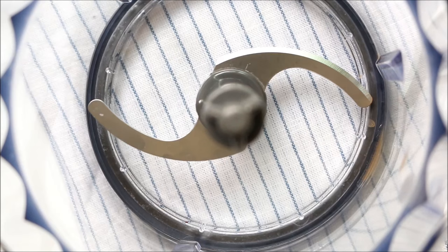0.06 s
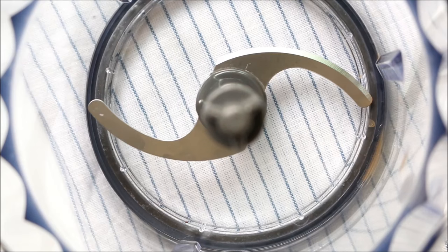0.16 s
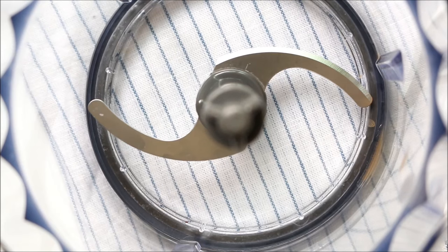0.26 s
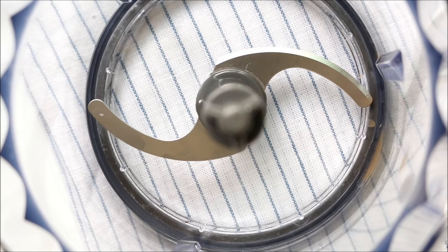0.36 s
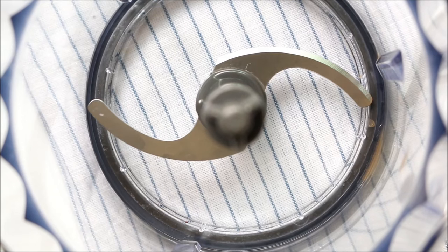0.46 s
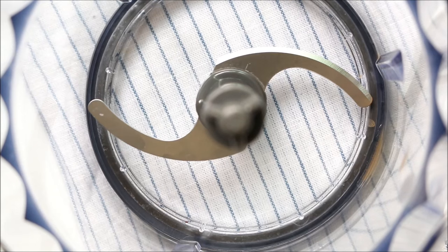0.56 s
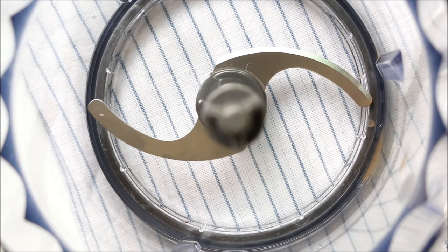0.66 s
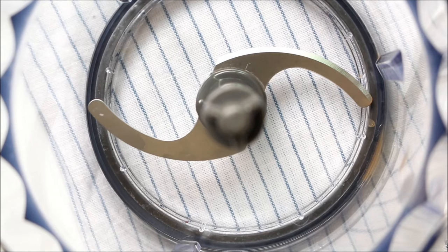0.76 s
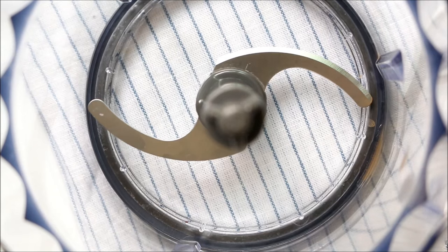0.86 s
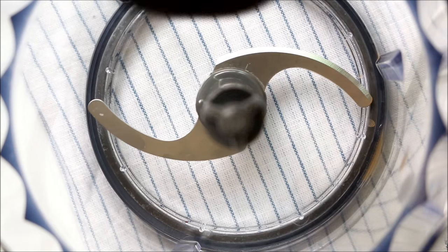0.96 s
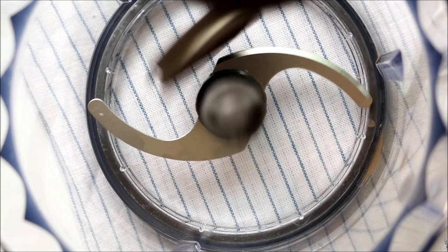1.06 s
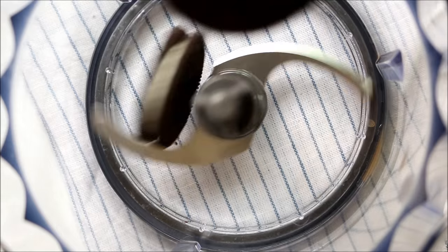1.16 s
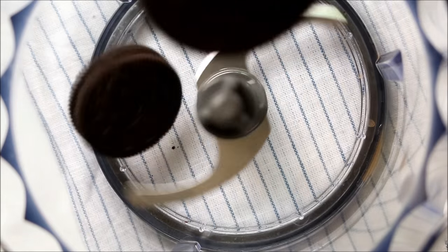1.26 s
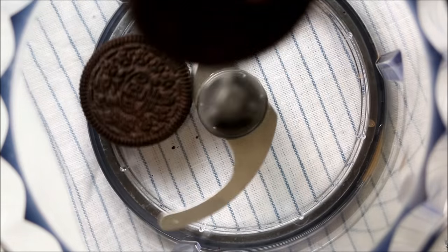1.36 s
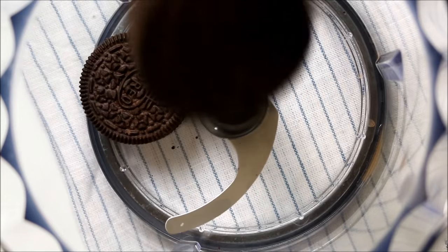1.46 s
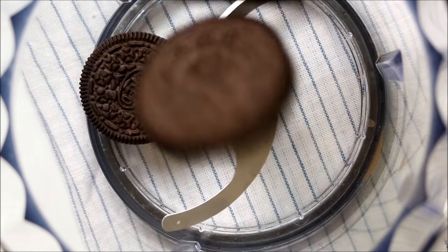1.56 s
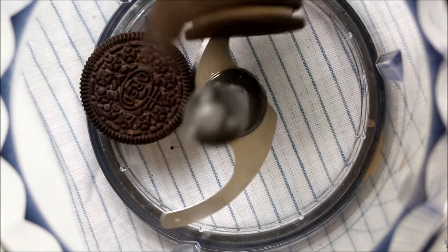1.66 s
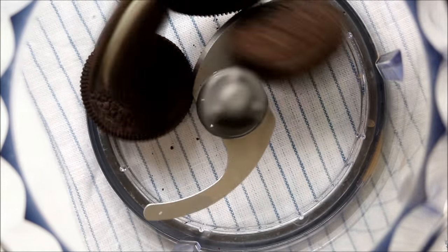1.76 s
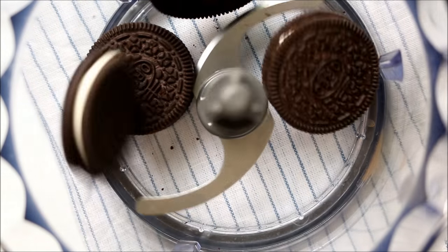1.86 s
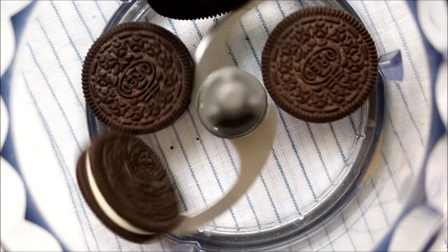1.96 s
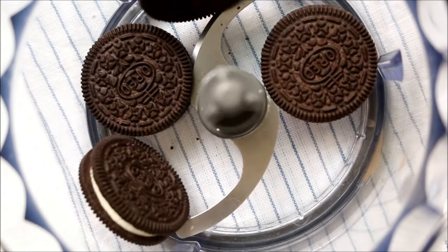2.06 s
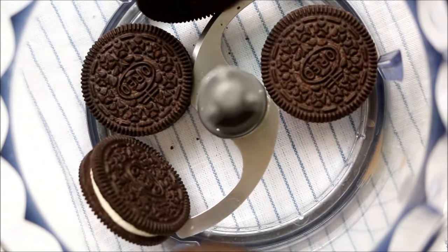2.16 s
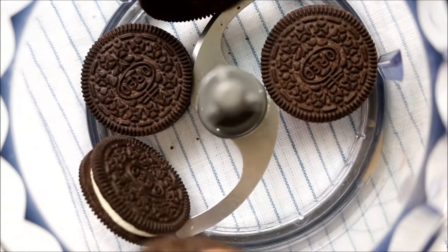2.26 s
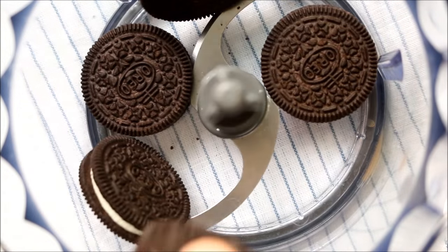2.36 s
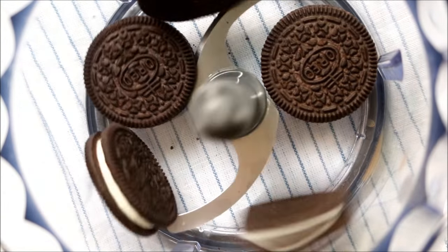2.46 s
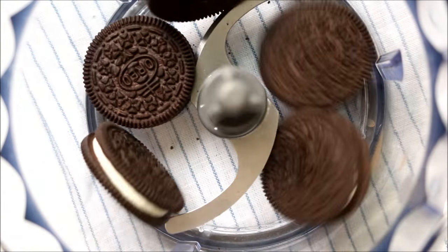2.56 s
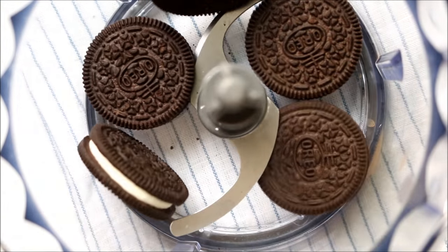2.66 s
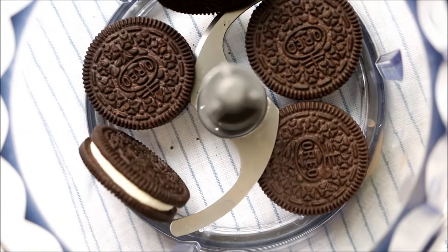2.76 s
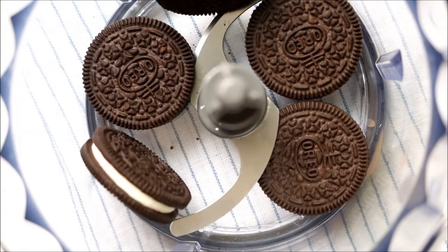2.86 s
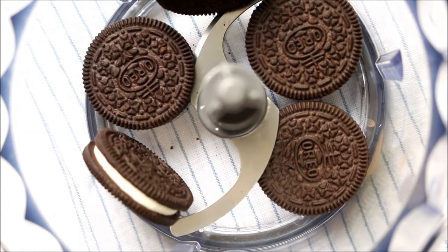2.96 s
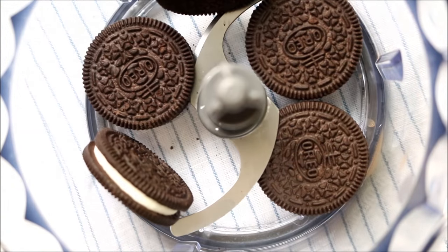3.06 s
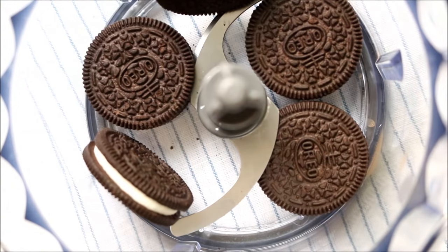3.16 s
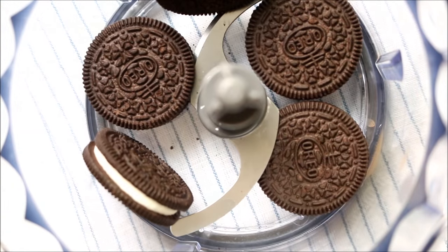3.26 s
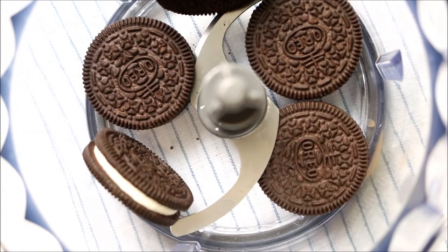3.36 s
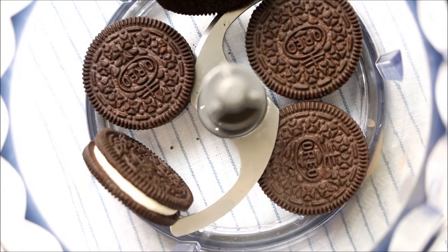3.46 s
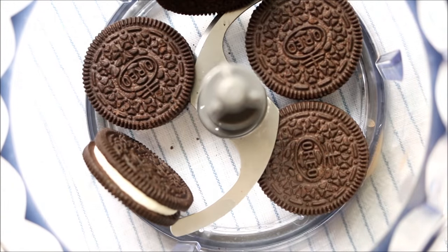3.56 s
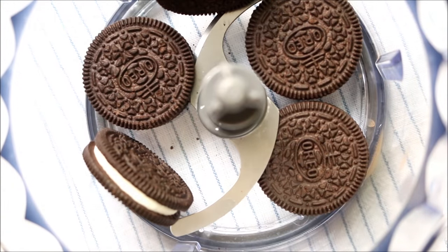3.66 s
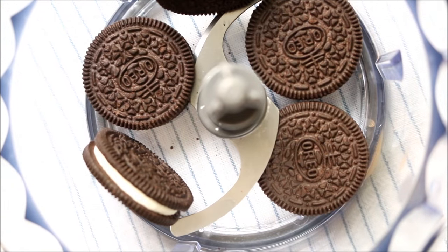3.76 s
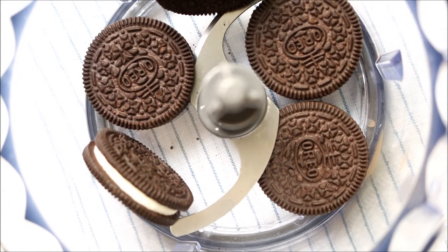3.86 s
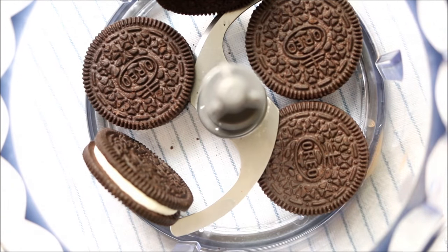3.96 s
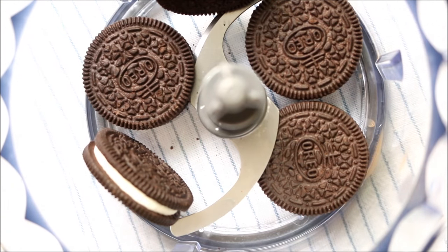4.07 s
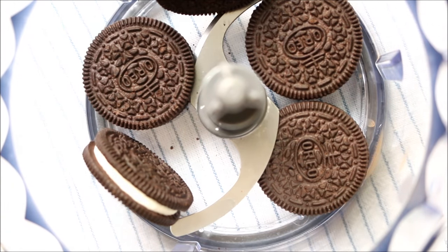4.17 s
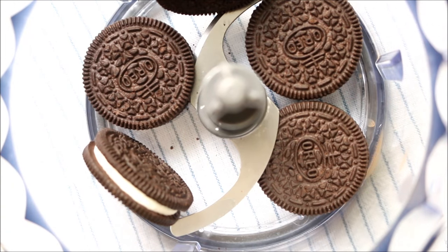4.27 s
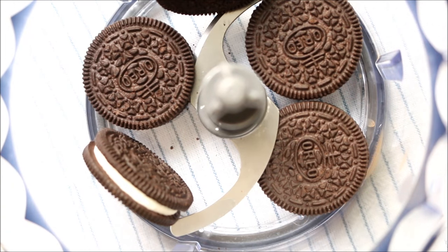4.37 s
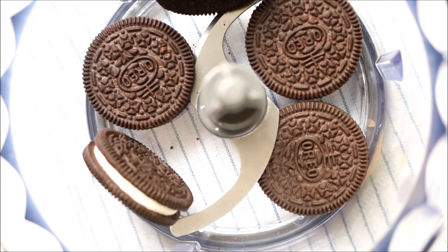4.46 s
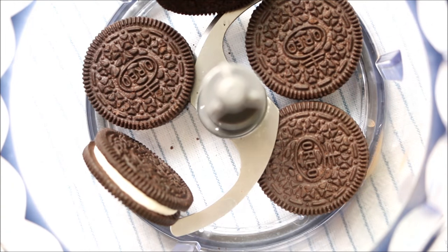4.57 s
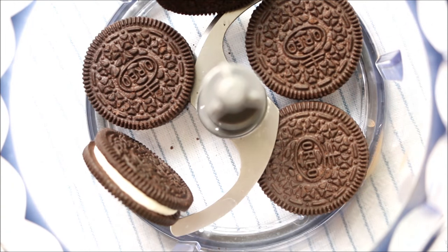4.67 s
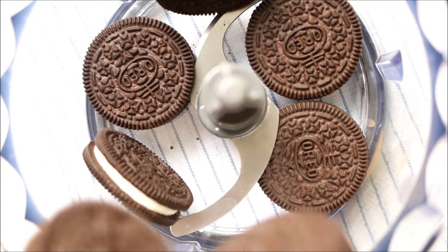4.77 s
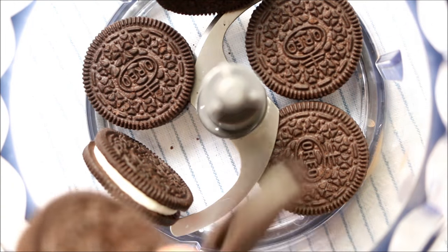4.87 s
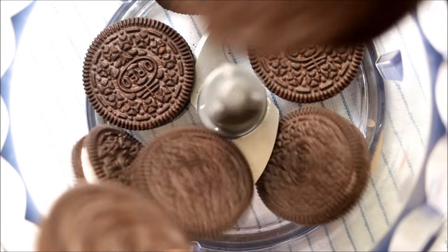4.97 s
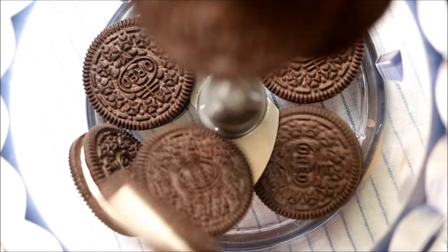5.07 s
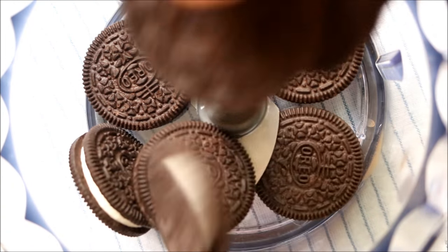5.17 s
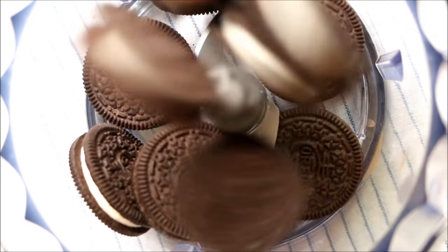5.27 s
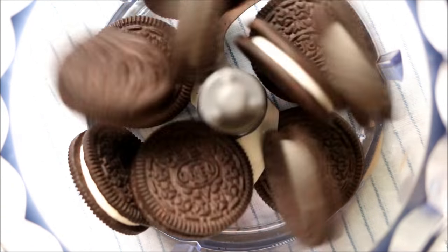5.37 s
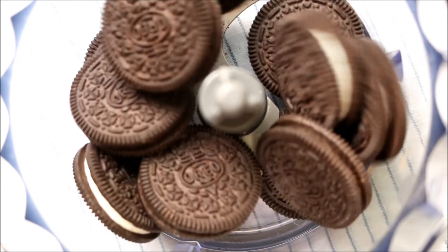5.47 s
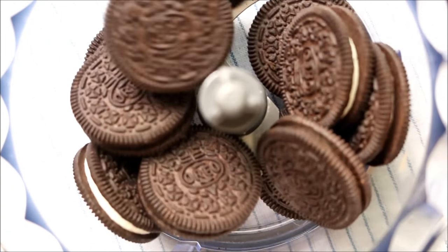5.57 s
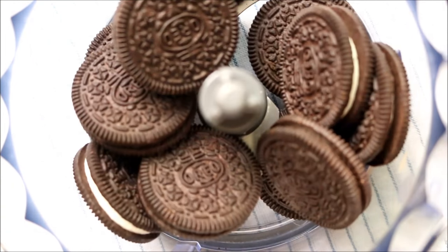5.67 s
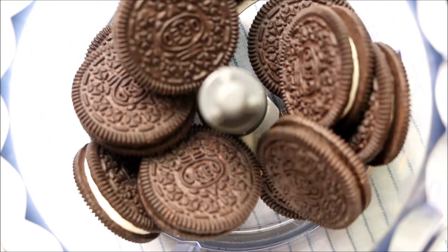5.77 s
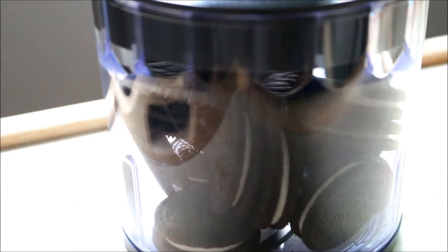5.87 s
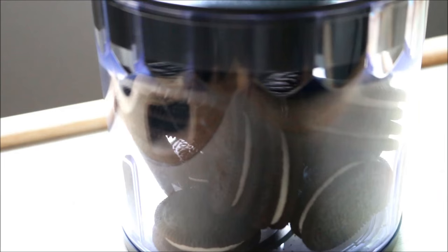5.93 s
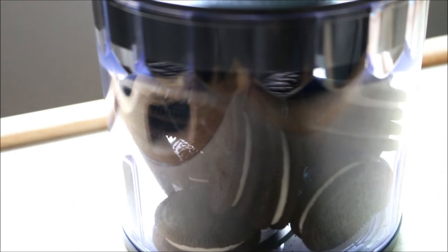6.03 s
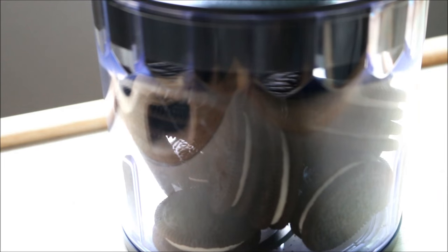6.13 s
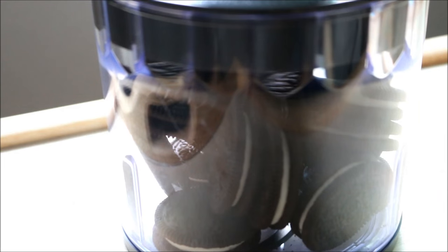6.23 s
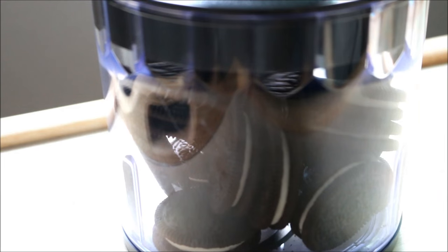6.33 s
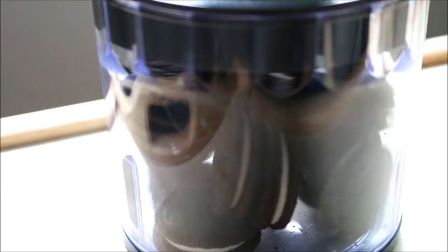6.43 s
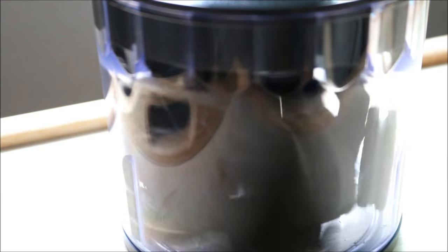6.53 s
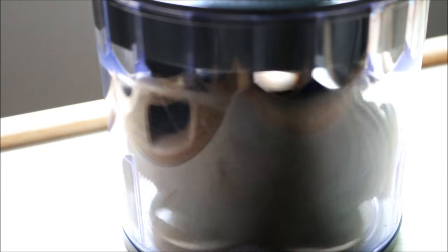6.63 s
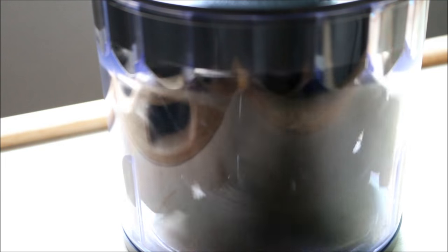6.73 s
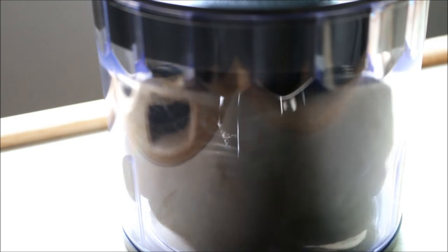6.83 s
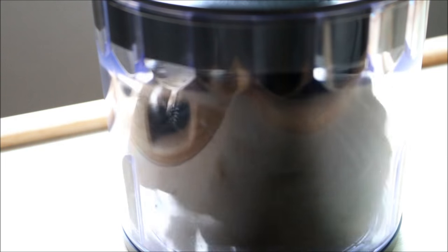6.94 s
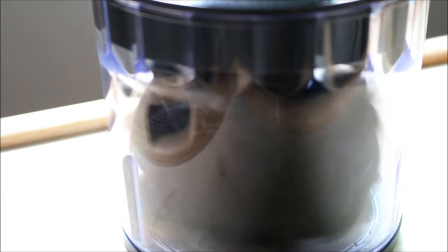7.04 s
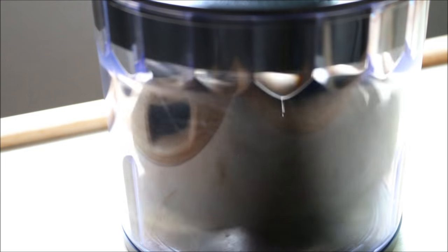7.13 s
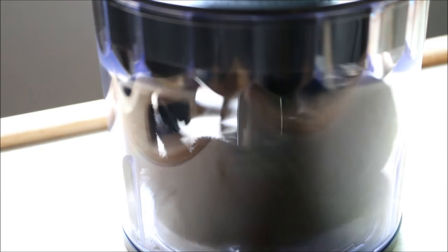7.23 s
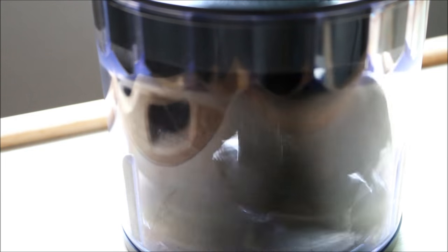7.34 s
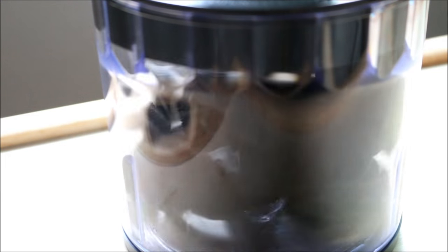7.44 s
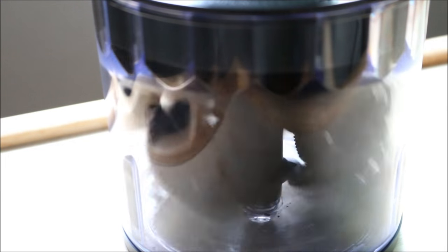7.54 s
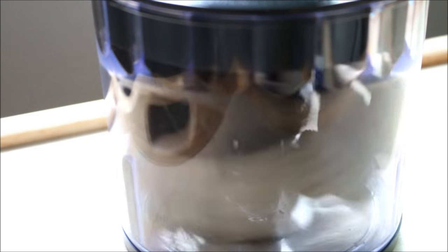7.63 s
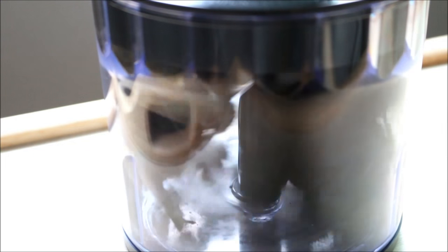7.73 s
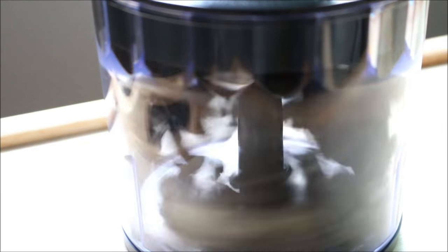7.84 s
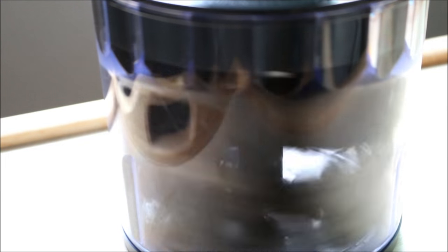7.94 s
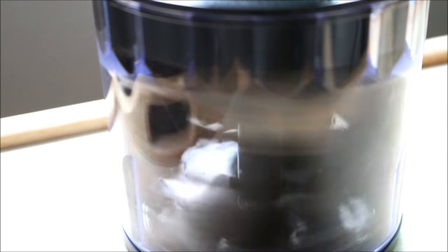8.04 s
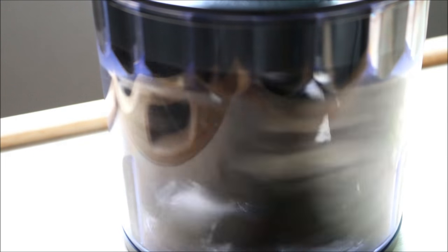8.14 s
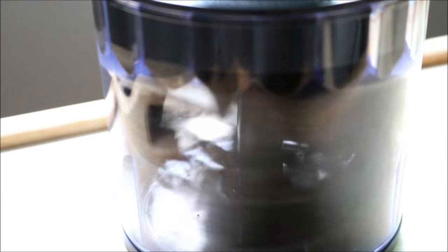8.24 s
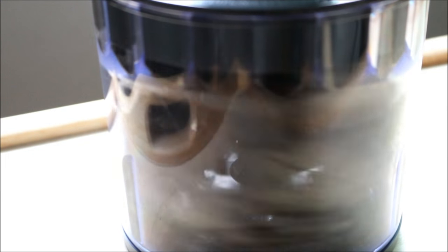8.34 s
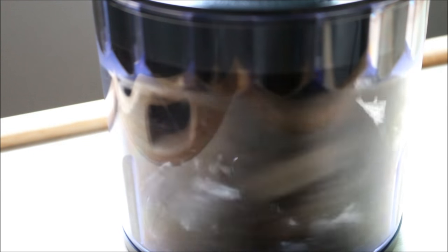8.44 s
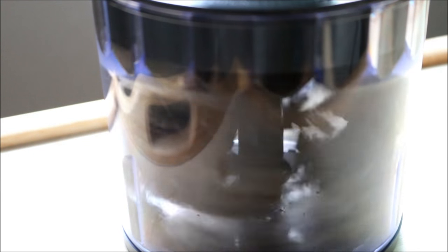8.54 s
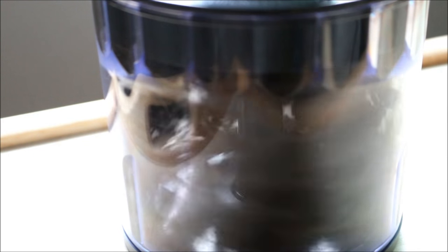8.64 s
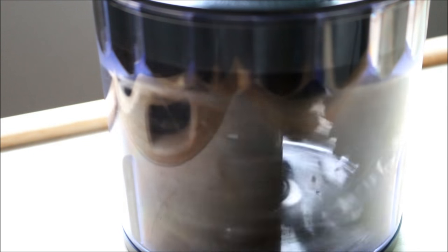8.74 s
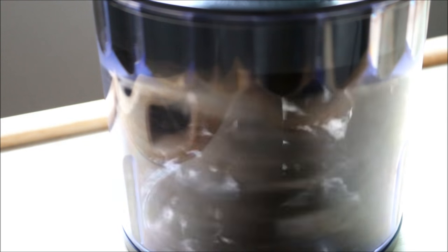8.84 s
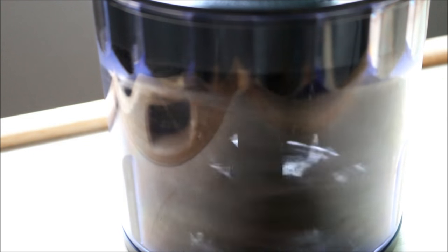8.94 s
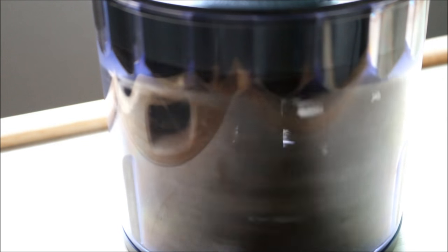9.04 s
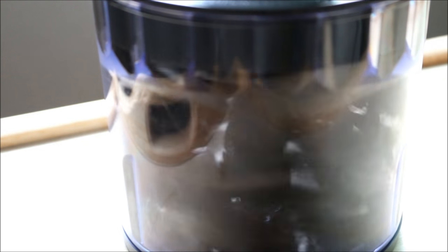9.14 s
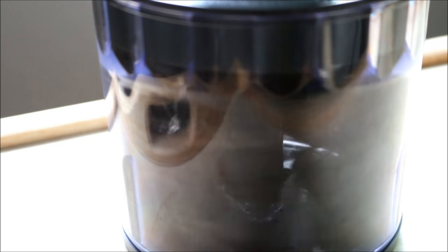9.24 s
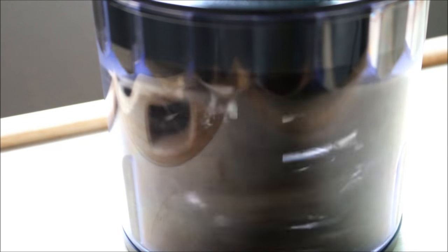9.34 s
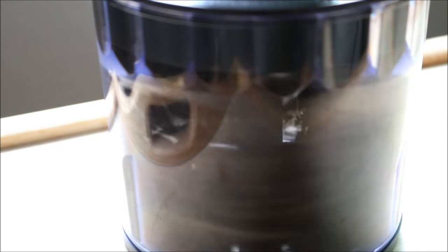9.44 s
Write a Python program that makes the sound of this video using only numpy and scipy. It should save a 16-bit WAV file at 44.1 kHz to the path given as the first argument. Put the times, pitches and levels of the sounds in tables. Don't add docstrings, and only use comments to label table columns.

```python
import sys
import numpy as np
from scipy import signal
from scipy.io import wavfile
from scipy.ndimage import uniform_filter1d

SR = 44100
rng = np.random.default_rng(int(sys.argv[2]) if len(sys.argv) > 2 else 0)


def voltage_ratio(level):
    return 10 ** (np.asarray(level, float) / 20)


def log_audio(samples):
    frames = np.atleast_2d(samples).T
    limited = np.clip(frames, -1, 1)
    pcm = np.round(limited * 32767).astype(np.int16)
    wavfile.write(sys.argv[1], SR, pcm)


N = 418950
TIME = np.arange(N) / SR
# start in seconds, end in seconds.
SCENE_CHANGE = (5.911, 5.975)


def evened(x):
    return x / np.sqrt(np.mean(x ** 2) + 1e-20)


def peaked(x):
    return x / np.max(np.abs(x))


def read(points, hz):
    f, value = np.transpose(points)
    return np.interp(np.log(hz + 1), np.log(f + 1), value)


def level(rows):
    rows, out = np.asarray(rows), np.zeros(N)
    at = np.arange(round(rows[0, 0] * SR), min(round(rows[-1, 0] * SR), N))
    out[at] = voltage_ratio(np.interp(at / SR, rows[:, 0], rows[:, 1]))
    return out


def add(mix, s, sound):
    part = mix[round(s * SR):][:len(sound)]
    part += sound[:len(part)]


def passed(x, lo_hz, hi_hz):
    return signal.sosfilt(signal.butter(2, [lo_hz, hi_hz], "band", fs=SR, output="sos"), x)


def coloured(x, points):
    hz = np.abs(np.fft.fftfreq(4096, 1 / SR))
    log_gain = np.log(voltage_ratio(np.maximum(read(points, hz), -90)))
    response = np.fft.ifft(np.exp(np.conj(signal.hilbert(log_gain)))).real[:2048]
    return evened(signal.oaconvolve(x, response)[:len(x)])


def resonator(x, hz, width):
    return signal.lfilter(*signal.iirpeak(hz, hz / width, SR), x)


def resonant(x, peaks):
    return evened(sum(voltage_ratio(db) * resonator(x, hz, width) for hz, width, db in peaks))


def ring(modes, t, spread):
    chance = np.clip(rng.standard_normal((len(modes), 2)), -2, 2)
    out = np.zeros(len(t))
    for (hz, db, t60), (louder, sharper) in zip(modes, chance):
        fading = voltage_ratio(db + 2.5 * louder - 60 * t / t60)
        out += fading * np.sin(2 * np.pi * hz * (1 + spread * sharper) * t)
    return out


def grains(per_s, spread_db, wash):
    size = voltage_ratio(spread_db * np.minimum(rng.exponential(1, N), 3))
    size *= rng.random(N) < per_s / SR
    return evened(size * rng.standard_normal(N)) + wash * rng.standard_normal(N)


def lumps(per_s, depth_db):
    drift = evened(uniform_filter1d(rng.standard_normal(N), int(SR / per_s)))
    return evened(voltage_ratio(depth_db * drift))


def slopes(rows):
    s, db, rise, fall = np.transpose(rows)[:, :, None]
    t = np.arange(0, N / SR + .01, .002)
    return t, db, np.maximum((s - t) / abs(rise), (t - s) / abs(fall))


def strokes(rows):
    t, db, away = slopes(rows)
    return np.interp(TIME, t, voltage_ratio(db - 20 * away).sum(axis=0))


# frequency in Hz, density in dB per Hz.
HISS_FIRST = [(40, -4.5), (90, -7.5), (250, -12), (600, -18), (1100, -19.5), (2800, -24), (15000, -27),
              (16500, -37)]
# frequency in Hz, density in dB per
# Hz.
HISS_SECOND = [(40, -6), (250, -12), (1200, -15), (2500, -22), (15000, -26.5), (16500, -38)]
# time in seconds, level in dB.
HISS_LEVEL = [(0, -56), (.25, -59.5), (5.9, -60), (5.97, -54), (6.01, -62), (6.2, -67), (9.5, -68)]


def hiss():
    noise = rng.standard_normal(N)
    first, second = coloured(noise, HISS_FIRST), coloured(noise, HISS_SECOND)
    return level(HISS_LEVEL) * np.where(TIME < SCENE_CHANGE[1], first, second)


# peak in seconds, level in dB.
NUDGES = [(0, -61), (1.3, -45), (1.81, -43.5), (2.52, -42), (3.36, -52), (4.02, -53), (5.04, -46),
          (5.549, -42.5), (7.45, -61), (8.21, -61), (8.97, -52)]


def table():
    wander = evened(uniform_filter1d(rng.standard_normal(N), 6000))
    sway = np.sqrt(2) * np.sin(2 * np.pi * np.cumsum(53.3 + 0.85 * wander) / SR)
    rise_s, fall_s, tremor_db = 0.085, 0.66, -74
    change = SCENE_CHANGE[0]
    before = [(s, db, rise_s, fall_s) for s, db in NUDGES if s < change]
    after = [(s, db, rise_s, fall_s) for s, db in NUDGES if s > change]
    nudges = strokes(before) * (TIME < change) + strokes(after)
    return (nudges + voltage_ratio(tremor_db)) * sway * lumps(9, 2.5)


# peak in seconds, level in dB, rise in seconds, fall in seconds.
BRUSHES = [
    (.964, -45.5, 0.096, 0.041),
    (3.194, -58.5, 0.33, 0.18),
    (3.334, -46, 0.026, 0.13),
    (3.568, -53, 0.038, 0.18),
    (3.854, -52.5, 0.13, 0.043),
    (4.092, -52, 0.18, 0.066),
    (4.2, -52, 0.014, 0.055),
    (4.646, -53, .02, 0.071),
    (4.752, -44.5, 0.009, 0.087),
]
# frequency in Hz, density in dB per Hz.
BRUSH_SPECTRUM = [(290, -37.5), (500, -11.5), (807, -13), (1450, -15.5), (6800, -9), (7530, -14.5),
                  (13100, -13), (16000, -19.5)]


def brushing():
    return strokes(BRUSHES) * coloured(grains(3500, 2.6, 0.34), BRUSH_SPECTRUM)


# frequency in Hz, width in Hz, level in dB.
WALL_MODES = [(1410, 2900, 2.5), (1930, 250, -9), (2280, 130, 7), (2480, 91, 0)]
# frequency in Hz, width in Hz, level in dB.
BLADE_MODES = [(3870, 550, 1.5), (4650, 360, 4), (5400, 180, -4), (5940, 330, -3.5), (10000, 12000, -10)]
BODY_DB = -3.5


def drop(thud_db, hz, wall_db, tick_db):
    t = np.arange(2600) / SR
    crumble = rng.standard_normal((2, len(t))) * t / 0.0057 * np.exp(-t / [[.0012], [.0008]])
    crumble += 0.062 * rng.standard_normal((2, len(t))) * np.exp(-t / [[.006], [.0035]])

    off_air = abs(np.log(hz / 640))
    thud = ring([(hz, 0, .017), (635, -17 - 20 * off_air, .06), (185, -27, .16), (225, -27, .12),
                 (1.3 * hz, -6, .009)], t, 0.032)
    softness = thud_db - tick_db
    thud = peaked(thud * (1 - np.exp(-t / (0.0005 * voltage_ratio(0.5 * softness)))))

    wall_spot = rng.uniform(-3, 3, len(WALL_MODES))
    blade_spot = rng.uniform(-3, 3, len(BLADE_MODES))
    wall_spot[0] = np.clip(0.43 * softness - 2, -8, 8)
    blade_spot[-1] = 0.069 * (tick_db + 18)
    wall = resonant(crumble[0], [(f, w, db + d) for (f, w, db), d in zip(WALL_MODES, wall_spot)])
    tick = resonant(crumble[1], [(f, w, db + d) for (f, w, db), d in zip(BLADE_MODES, blade_spot)])
    wall = passed(passed(wall, 740, 2300), 600, 3200)
    tick = passed(tick, 3000, 17000)
    return voltage_ratio(thud_db) * thud + voltage_ratio(wall_db + BODY_DB) * peaked(wall) + voltage_ratio(tick_db + BODY_DB) * peaked(tick)


def taps(s, gap, shrink, db, loss_db, hz, wall_db, tick_db, steps):
    times = s + gap * (1 - shrink ** steps) / (1 - shrink)
    return [(at, d, hz, d + wall_db, d + tick_db) for at, d in zip(times, db - loss_db * abs(steps))]


# start in seconds, thud in dB, thud pitch in Hz, wall in dB, tick in dB.
FIRST_DROPS = [(1.0973, -4.5, 671, 1, -3), (1.1073, -29, 599, -24, -7), (1.1794, -16.5, 717, -10.5, -22),
               (1.3094, -24.5, 674, -21, -6.5), (1.3639, -14, 954, -29, -20.5),
               (1.3746, -14.5, 610, -14, -15), (1.3943, -15.5, 884, -14, -22),
               (1.4004, -10.5, 573, -8.5, -9), (1.4472, -10, 660, -12, -16),
               (1.5384, -8.5, 630, -11.5, -20), (1.5776, -15, 610, -14.5, -35), (1.6418, -5.5, 573, -5, -2),
               (1.7232, -24, 633, -16, -22), (1.7443, -31.5, 624, -16, -14.5),
               (1.7589, -30.5, 624, -6, -31.5), (1.7918, -16, 1070, -19, -34),
               (1.8148, -11.5, 556, -9, -14), (1.8595, -15.5, 890, -18.5, -13.5),
               (1.8753, -15, 649, -19.5, -21), (1.8988, -21, 706, -16, -11), (1.9412, -44, 1010, -30, -16),
               (1.963, -17, 643, -26, -22), (1.9768, -22, 1470, -20, -20), (2.002, -10.5, 770, -7, -15.5)]
# start in seconds, thud in dB, thud pitch in Hz, wall in dB, tick in dB.
NEXT_DROP = [(2.455, -6, 693, -5, -12), (2.472, -11, 1310, -3.5, -12.5), (2.5262, -19, 526, -10.5, -20.5),
             (2.532, -8, 686, -6, -6.5), (2.5608, -19, 940, -31, -37.5), (2.5873, -9.5, 836, -12, -21.5),
             (2.626, -16, 1000, -13, -26), (2.661, -23, 676, -7, -18), (2.6683, -6.5, 796, -10.5, -13),
             (2.7094, -17, 900, -23.5, -20), (2.7126, -21.5, 650, -11.5, -28)]
# start in seconds, thud in dB, thud pitch in Hz, wall in dB, tick in dB.
HANDFUL_DROPS = [(4.9268, -3, 660, -9, -9), (4.9443, -20, 624, -24, -39), (4.9618, -19, 1120, -24, -30.5),
                 (4.994, -17, 600, -18, -28), (5.005, -14.5, 633, -16, -33.5),
                 (5.0357, -17, 1180, -22, -21), (5.0428, -18, 670, -8.5, -21.5),
                 (5.049, -18.5, 1140, -9, -25), (5.0762, -10.5, 815, -11.5, -24),
                 (5.1238, -17, 530, -11.5, -24.5), (5.232, -18.5, 1160, -20.5, -16.5),
                 (5.2673, -6, 653, -7, -15.5), (5.28, -20, 1500, -22.5, -14.5),
                 (5.308, -15, 1100, -25.5, -30.5), (5.3254, -12.5, 644, -10.5, -16.5),
                 (5.3328, -32, 602, -17, -9.5), (5.346, -1.5, 670, -7.5, -14.5),
                 (5.372, -46.5, 663, -27.5, -24), (5.4211, -11.5, 750, -9, -14),
                 (5.4415, -18.5, 1060, -23, -25.5), (5.472, -20.5, 1160, -16, -41)]
# start in seconds, thud in dB, tick in dB.
LIGHT_TOUCHES = [(1.5142, -26.5, -25.5), (1.5893, -20, -29.5), (1.702, -37, -19.5), (1.809, -32, -41.5),
                 (1.8328, -19.5, -40), (2.266, -35, -30), (2.599, -20, -27), (4.9794, -23, -29),
                 (5.1165, -20.5, -22), (5.519, -29, -31), (5.5428, -26.5, -28.5)]
BLADE_SING_HZ = [1733, 2030, 2766, 3250, 3760, 4425, 4730, 5250]


def impacts():
    out = np.zeros(N)
    touches = [(s, db, 750 * np.exp(0.23 * rng.uniform(-1, 1)), db + 2, tick) for s, db, tick in LIGHT_TOUCHES]
    wobble = taps(2.0435, gap=.0255, shrink=.875, db=-17, loss_db=2.5, hz=624, wall_db=3, tick_db=-0.5,
                  steps=np.arange(8))
    rock = taps(2.2497, gap=.0575, shrink=.96, db=-32, loss_db=6, hz=660, wall_db=5.5, tick_db=3.5,
                steps=np.arange(-1, 4))
    t = np.arange(9000) / SR
    for s, *blow in [*FIRST_DROPS, *NEXT_DROP, *HANDFUL_DROPS, *touches, *wobble, *rock]:
        add(out, s, drop(*blow))
        struck = rng.uniform(-16, 4, len(BLADE_SING_HZ))
        singing = [(hz, blow[-1] - 38 + d, 0.2) for hz, d in zip(BLADE_SING_HZ, struck)]
        add(out, s, ring(singing, t, .008))
    for s, db, *_ in rock:
        add(out, s, ring([(2470, db - 0.5, 0.066)], t[:4000], 0))
    return out


# start in seconds, peak in dB, centre in Hz.
EDGE_SNAPS = [(1.0974, -1.5, 9070), (1.3101, -21, 9100), (1.455, -23.5, 9330), (1.5224, -28.5, 8160),
              (1.5384, -18, 9560), (1.6453, -2, 12600), (1.731, -19, 11500), (1.7344, -24, 13000),
              (1.8813, -16.5, 8140), (1.9003, -15.5, 11000), (1.941, -20.5, 9560), (2.0996, -37.5, 10500),
              (2.131, -31.5, 13200), (2.169, -38, 8540), (2.455, -15.5, 9160), (2.4854, -30.5, 9220),
              (2.5256, -17, 8030), (2.5444, -24, 9900), (2.5731, -33.5, 9630), (2.5855, -18, 10280),
              (2.6004, -32, 9250), (2.672, -26, 8130), (4.9273, -9, 8850), (5.0795, -17, 9760),
              (5.115, -25, 11000), (5.228, -25, 10900), (5.2666, -18, 9250), (5.273, -22.5, 13320),
              (5.3337, -13.5, 11490), (5.3857, -31, 8120), (5.4264, -35, 10800)]


def snaps():
    t, out = np.arange(500) / SR, np.zeros(N)
    for s, db, hz in EDGE_SNAPS:
        crack = rng.standard_normal(len(t)) * t * np.exp(-t / 0.00059)
        crack = passed(resonant(crack, [(hz, hz / 2, 0)]), 4300, 14000)
        add(out, s, voltage_ratio(db - 1.5) * peaked(crack))
    return out


# start in seconds, peak in dB, pitch in Hz.
WALL_PATCHES = [(1.0978, -12, 2380), (1.1831, -15, 2330), (1.3103, -23, 3240), (1.364, -22, 1210),
                (1.376, -17, 1700), (1.4006, -0.5, 2280), (1.449, -10.5, 1300), (1.5398, -6.5, 1200),
                (1.5773, -13.5, 1080), (1.643, 1.5, 2150), (1.68, -26, 2260), (1.7205, -19, 1400),
                (1.7224, -21, 2200), (1.7624, -26.5, 2350), (1.7917, -17.5, 1270), (1.8152, -12.5, 2020),
                (1.8616, -5.5, 2320), (1.943, -15.5, 2450), (1.9604, -16.5, 1500), (1.9778, -29, 1410),
                (2.0036, -15.5, 1600), (2.0424, -9, 2480), (2.4543, -13, 1140), (2.4712, -8, 2080),
                (2.5321, -1, 2660), (2.5615, -13.5, 2260), (2.5874, -20, 1930), (2.6353, -27, 1260),
                (2.6677, -11, 2630), (2.7096, -7.5, 2290)]
# start in seconds, peak in dB, pitch in Hz.
BLADE_PATCHES = [(1.0978, -0.5, 3830), (1.1785, -24, 3980), (1.3096, -15, 5730), (1.3637, -21.5, 4100),
                 (1.3752, -22.5, 4300), (1.4006, -9, 3860), (1.5139, -17.5, 4800), (1.532, -14.5, 4420),
                 (1.6423, -1.5, 4800), (1.7284, -12.5, 4660), (1.815, -16.5, 6300), (1.8607, -22, 4200),
                 (1.8805, -23.5, 5100), (1.9, -16, 4700), (1.943, -22, 5860), (2.0018, -26, 4950),
                 (2.0365, -21, 3940), (2.2492, -28, 3820), (2.3065, -28, 3870), (2.3653, -26.5, 3750),
                 (2.4542, -22.5, 3560), (2.4715, -22, 4070), (2.526, -18.5, 3500), (2.574, -24.5, 4600),
                 (2.6672, -12, 3500), (2.7092, -23, 3770)]
# start in seconds, peak in dB, pitch in Hz.
HANDFUL_WALL_PATCHES = [(4.926, -1.5, 2370), (4.9582, -14.5, 1310), (4.9817, -20.5, 2150),
                        (4.9955, -9.5, 1440), (5.042, -18, 1560), (5.0795, 4, 2290), (5.1267, -12.5, 1490),
                        (5.2326, -23, 1520), (5.267, 0, 1410), (5.305, -19, 1350), (5.3243, -13, 1570),
                        (5.3459, -11.5, 2480), (5.3727, -17.5, 2230), (5.4217, -19, 1260),
                        (5.4721, -13.5, 2240)]
# start in seconds, peak in dB, pitch in Hz.
HANDFUL_BLADE_PATCHES = [(4.9273, -10, 4160), (5.0373, -18.5, 3770), (5.079, -16, 3800),
                         (5.1165, -21.5, 3740), (5.2331, -13, 5430), (5.267, -21, 4530), (5.305, -23, 3780),
                         (5.3316, -7, 5280), (5.347, -12, 4690), (5.3723, -21.5, 4960), (5.4202, -23, 5160)]


def patches(rows):
    t, out = np.arange(1200) / SR, np.zeros(N)
    for s, db, hz in rows:
        crumble = rng.standard_normal(len(t)) * t * np.exp(-t / .0011)
        patch = resonant(resonant(crumble, [(hz, hz / 6.4, 0)]), [(hz, hz / 2, 0)])
        add(out, s, voltage_ratio(db - 3.5) * peaked(patch))
    return out


def struck_patches():
    return patches([*WALL_PATCHES, *BLADE_PATCHES, *HANDFUL_WALL_PATCHES, *HANDFUL_BLADE_PATCHES])


# peak in seconds, level in dB, rise in seconds, fall in seconds.
AIR_SWELLS = [
    (1.122, -32, 0.0086, 0.024),
    (1.184, -10.5, 0.0091, 0.012),
    (1.73, -17.5, 0.013, 0.021),
    (1.76, -16.5, 0.02, 0.017),
    (1.868, -17, 0.0079, 0.013),
    (4.952, -17, 0.0095, 0.021),
    (5.008, -14.5, 0.014, 0.013),
    (5.331, -11, 0.007, 0.014),
    (5.39, -38, .02, 0.029),
]


def bowl_air():
    wander = evened(uniform_filter1d(rng.standard_normal(N), 800))
    return strokes(AIR_SWELLS) * np.sin(2 * np.pi * np.cumsum(617 + 20 * wander) / SR)


# peak in seconds, level in dB, rise in seconds, fall in seconds.
ROLLS = [
    (1.13, -37, 0.011, 0.84),
    (1.43, -42.5, 0.22, 0.065),
    (1.74, -28.5, .03, 0.18),
    (1.95, -33, 0.19, 0.29),
    (2.62, -33.5, 0.15, 0.18),
    (5.38, -32.5, 0.35, 0.27),
]
# frequency in Hz, width in Hz, level in dB.
BOWL_MODES = [(182, 210, -9), (633, 200, -2.5), (1000, 560, -7.5), (2290, 280, -2), (1720, 200, -10),
              (4600, 2500, -11), (10500, 7000, -22)]


def rolling():
    out = np.zeros(N)
    for hz, width, db in BOWL_MODES:
        contacts = evened(passed(grains(700, 1.8, .7), hz / 1.7, hz * 1.4))
        out += voltage_ratio(db) * resonator(contacts, hz, width)
    return voltage_ratio(-2.5) * strokes(ROLLS) * evened(out)


def cookies():
    return passed(impacts() + struck_patches() + bowl_air() + rolling(), 91, 13000) + snaps()


# start in seconds, peak in dB, pitch in Hz.
PLATE_KNOCKS = [
    (3.076, -33.5, 733),
    (3.171, -32, 1070),
    (3.33, -21, 1116),
    (3.549, -23.5, 530),
    (3.616, -30.5, 483),
    (3.757, -38, 488),
    (3.824, -28.5, 557),
    (4.038, -27.5, 604),
    (4.14, -31, 513),
]
# start in
# seconds, pitch in Hz, level in dB, t60 in seconds.
PLATE_RINGS = [(2.962, 1460, -35.5, 0.016), (2.962, 2540, -44, 0.033), (3.35, 1054, -49, 1.1),
               (3.562, 2800, -40, 0.064), (3.605, 1910, -51.5, 0.66), (3.619, 1040, -45, 0.98),
               (3.84, 2770, -44, 0.076), (4.1, 2770, -43, 0.056), (5.6, 685, -62, 1.8),
               (4.7, 89.3, -50, 0.63), (5.5, 199, -34, 0.37), (5.65, 212.7, -40.5, 0.094)]
# peak in seconds, level in dB, rise in seconds, fall in seconds.
HAND_GRABS = [
    (2.966, -45, 0.0085, 0.0085),
    (3.18, -40.5, 0.17, 0.45),
    (3.328, -30, 0.013, 0.12),
    (3.558, -30.5, 0.017, 0.12),
    (3.76, -37.5, 0.066, 0.063),
    (3.842, -35, 0.036, 0.054),
    (3.934, -37, 0.014, 0.084),
    (4.044, -37.5, 0.012, 0.11),
    (4.13, -44, 0.16, 0.19),
]
# frequency in Hz, width in Hz, level in dB.
PLATE_MODES = [(235, 49, 20.5), (467, 207, 18), (1070, 22, 8), (2350, 210, -1)]


def plate():
    t, out = np.arange(15000) / SR, np.zeros(N)
    soft, unsteady = 1 - np.exp(-t / 0.0011), lumps(12, 1.5)
    for s, peak_db, hz in PLATE_KNOCKS:
        knock = ring([(hz, 0, .02), (210, -6, .04), (500, -4, .03), (1150, -5, .02)], t, 0.014)
        add(out, s, voltage_ratio(peak_db) * peaked(knock * soft))
    for s, *mode in PLATE_RINGS:
        add(out, s, ring([mode], t, 0) * soft * unsteady[round(s * SR):][:len(t)])
    shuffle = passed(resonant(grains(630, 3.2, 1.0), PLATE_MODES), 104, 2243)
    return out + voltage_ratio(-3.5) * strokes(HAND_GRABS) * shuffle


def switch():
    click = [(1900, -39), (2990, -40), (6000, -45), (12500, -44)]  # (Hz, peak dB)
    return passed(patches([(5.9762, db, hz) for hz, db in click]), 91, 13000)


START_S, BREAKDOWN_S = 6.47, 1.47
# peak in seconds, level over the trend in dB, rise in seconds, fall in seconds.
HEAP_SURGES = [(6.472, -7, 0.0048, 0.017), (6.51, 6.5, 0.01, 0.21), (6.655, 13, 0.045, 0.067),
               (6.72, 11.5, 0.033, 0.061), (6.83, 9.5, 0.088, 0.021), (6.92, 13, 0.077, 0.055),
               (7.09, 12, 0.032, 0.099), (7.21, 12, 0.015, 0.067), (7.29, 9.5, 0.031, 0.052),
               (7.4, 11, 0.06, 0.085), (7.51, 6, 0.063, 0.31), (8.44, -5, 0.015, 0.14)]


def grind():
    t, db, away = slopes(HEAP_SURGES)
    surge_db = (db * np.maximum(1 - away, 0)).sum(axis=0)
    since = t - START_S
    fine = np.clip(since / BREAKDOWN_S, 0, 1)
    thinning_db = -1 * np.maximum(since - BREAKDOWN_S, 0)
    chunks_db = -41 + 0.76 * surge_db + thinning_db
    crumbs_db = np.interp(fine, [0, 1], [-56, -36.5]) + surge_db
    return [voltage_ratio(np.interp(TIME, t, d)) * (TIME > START_S) for d in (chunks_db, crumbs_db)]


def motor():
    rumble = resonant(resonant(rng.standard_normal(N), [(338, 330, 0)]), [(455, 310, 0)])
    return level([(START_S, -45), (6.6, -45.5), (N / SR, -45.5)]) * rumble


# frequency in Hz, density in dB per Hz.
CRUMB_SPECTRUM = [(1060, -55), (1800, 1.5), (2560, 1), (3740, 5), (4760, 5), (7100, -2.5), (8620, -1.5),
                  (9370, 2.5), (10300, -1.5), (11100, 2.5), (12300, -2), (13100, -1), (14600, -7.5),
                  (16000, -11), (16500, -50)]
# start in seconds, peak in dB, pitch in Hz.
BLADE_STRIKES = [(6.472, -26.5, 990), (6.505, -25, 1460), (6.649, -20, 1040), (6.729, -18, 1020),
                 (6.797, -19, 1410), (6.823, -18.5, 810), (6.852, -13.5, 1000), (6.935, -18, 830),
                 (7.005, -22.5, 1360), (7.044, -17.5, 1040), (7.273, -22, 1410), (7.296, -17, 1330)]


def strikes():
    t, out = np.arange(1500) / SR, np.zeros(N)
    for s, peak_db, hz in BLADE_STRIKES:
        crack = coloured(rng.standard_normal(len(t)) * t * np.exp(-t / 0.00091), CRUMB_SPECTRUM)
        knock = ring([(hz, 0, .014), (450, -12, .015), (1.45 * hz, -8, .008)], t, 0.013)
        knock *= 1 - np.exp(-t / 0.0006)
        add(out, s, voltage_ratio(peak_db - 4.5) * (peaked(knock) + voltage_ratio(-3.5) * peaked(crack)))
    return out


# frequency in Hz, density in dB per Hz.
CHUNK_SPECTRUM = [(60, -14.5), (136, -35), (194, -2), (318, -1.5), (628, -3), (1350, -1.5), (2000, -9),
                  (3500, -17.5), (7700, -120)]
# start in seconds, crunch peak in dB, fine spray in dB.
CRUMB_BURSTS = [(6.5049, -28, -52), (6.548, -30, -42), (6.699, -24, -29), (6.7184, -23, -49),
                (6.765, -20.5, -49), (6.826, -22, -48), (6.8527, -18.5, -44), (6.885, -21.5, -28),
                (7.0661, -29, -52), (7.087, -22.5, -44), (7.1299, -24, -32), (7.1798, -21, -41),
                (7.197, -21, -24), (7.2582, -23.5, -35), (7.2946, -22, -40), (7.3549, -25, -49),
                (7.3978, -20, -36), (7.502, -17, -27), (7.5704, -19, -23), (7.6488, -19, -24.5),
                (7.709, -19, -34.5), (7.7363, -22, -33), (7.826, -17, -29), (7.8803, -36, -31),
                (7.9331, -27, -41), (7.967, -20, -25), (8.023, -18, -43), (8.0908, -23, -33),
                (8.171, -19, -31), (8.338, -25, -30), (8.372, -24, -29), (8.392, -36, -26),
                (8.654, -27, -34), (8.721, -26, -22.5), (8.939, -21, -26), (9.0102, -24, -23.5),
                (9.2226, -22, -25.5), (9.394, -18.5, -24)]


def chopper():
    sweep = lumps(90, 1.1)
    tumbling, spraying = grind()
    rise_s, fall_s = 0.0023, 0.021
    crunch = strokes([(s + 0.0011, db - 11.5, rise_s, fall_s) for s, db, _ in CRUMB_BURSTS])
    fine = strokes([(s + 0.0011, db - 3.5, rise_s, fall_s) for s, _, db in CRUMB_BURSTS])
    chunks = np.hypot(tumbling, 0.5 * crunch) * lumps(40, 2.7)
    chunks *= coloured(grains(1200, 2.2, 1.2) * sweep, CHUNK_SPECTRUM)

    early = np.exp(-abs(TIME - START_S) / BREAKDOWN_S)
    crumbs = np.zeros(N)
    for bursts, lo_hz, hi_hz in ((crunch, 800, 3450), (crunch, 3450, 6900), (fine, 6900, 17000)):
        spray = grains(1500, 3.5, .7) * lumps(150, 2)
        spray += 1.1 * early * grains(220, 3, 0)
        spray = passed(coloured(spray * sweep, CRUMB_SPECTRUM), lo_hz, hi_hz)
        crumbs += np.hypot(0.78 * spraying, bursts) * spray
    return chunks + crumbs + motor() + strikes()


# frequency in Hz, t60 in seconds.
ROOM_DECAY = [(150, 0.48), (600, 0.31), (2400, 0.31), (6000, 0.09), (14000, 0.13)]


def kitchen(x):
    echoes = np.zeros(SR // 2)
    at = np.arange(200, len(echoes) - 20, 20)
    echoes[at + rng.integers(0, 20, len(at))] = rng.choice([-1., 1.], len(at))
    hz, t, z = signal.stft(echoes, SR, nperseg=256)
    tail = signal.istft(z * voltage_ratio(-60 * t / read(ROOM_DECAY, hz)[:, None]), SR, nperseg=256)[1]
    return voltage_ratio(-16) * signal.oaconvolve(x, tail / np.linalg.norm(tail))[:N]


def scene():
    start, end = SCENE_CHANGE
    hand = (brushing() + plate()) * (TIME < start)
    near = cookies() + hand + switch() + chopper()
    heard = np.where((TIME > start) & (TIME < end), voltage_ratio(-45), 1)
    return np.tile((near + kitchen(near) + table() + hiss()) * heard, (2, 1))


def low_pass(x):
    return signal.sosfilt(signal.butter(12, 16870, fs=SR, output="sos"), x)


def record(dry):
    loud = uniform_filter1d(np.diff(dry[0], prepend=0) ** 2, 1024)
    quiet = (loud < voltage_ratio(2 * -42)) * (loud > voltage_ratio(-170))
    side = voltage_ratio(-2) * quiet * passed(hiss(), 350, 15000)
    wide = 1.053 * np.tanh(dry / 0.93) + [side, -side]
    limited = signal.oaconvolve(wide, signal.firwin(101, 16300, fs=SR)[None], "same")
    return low_pass(limited)


dry = scene()
out = record(dry)
log_audio(out)
```